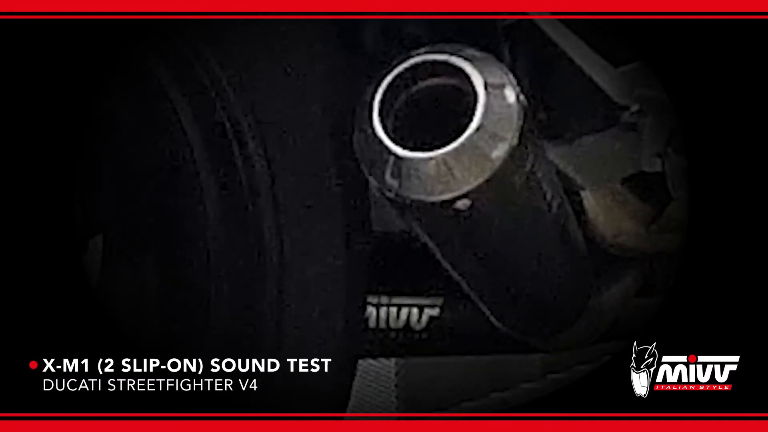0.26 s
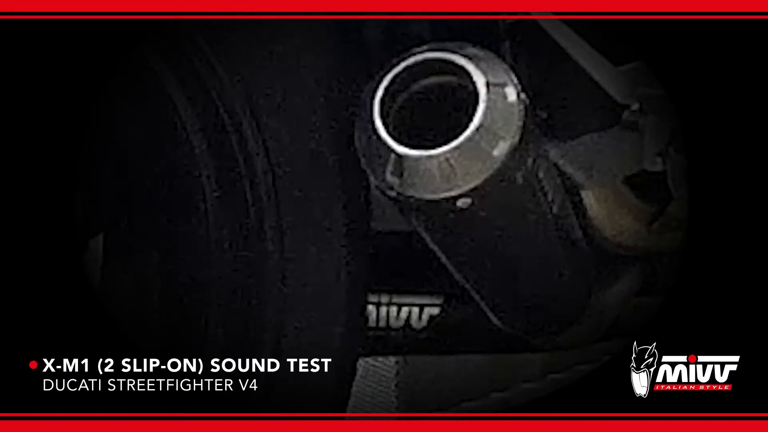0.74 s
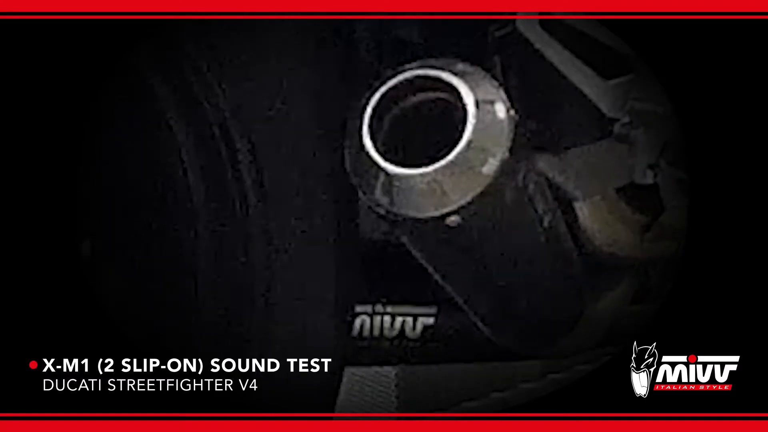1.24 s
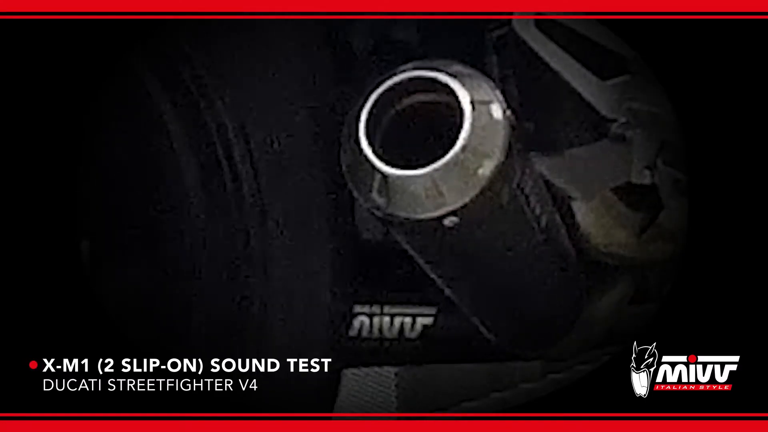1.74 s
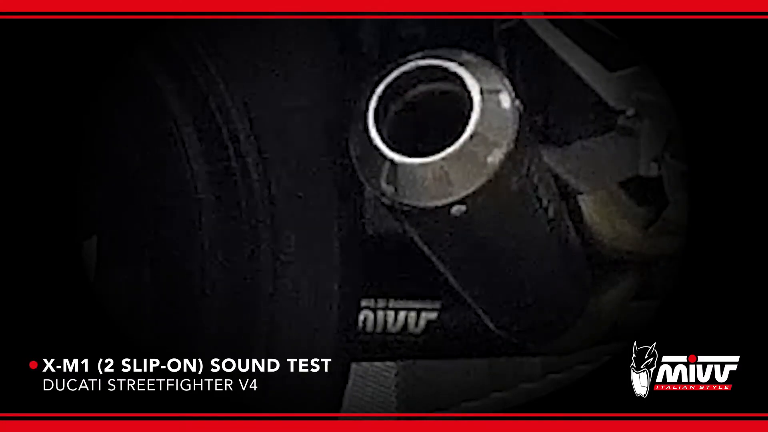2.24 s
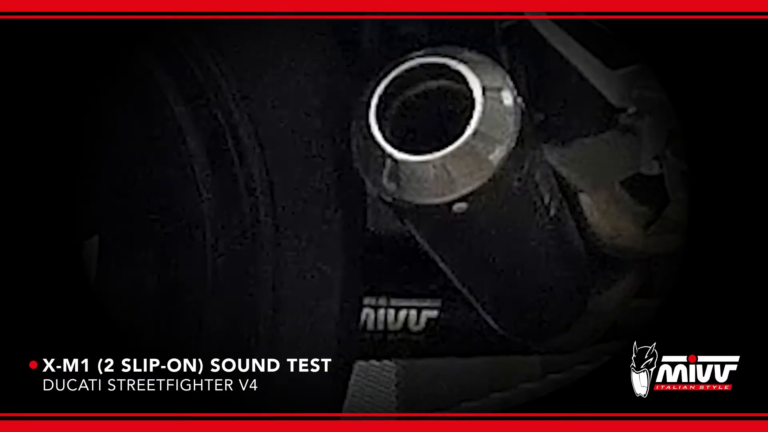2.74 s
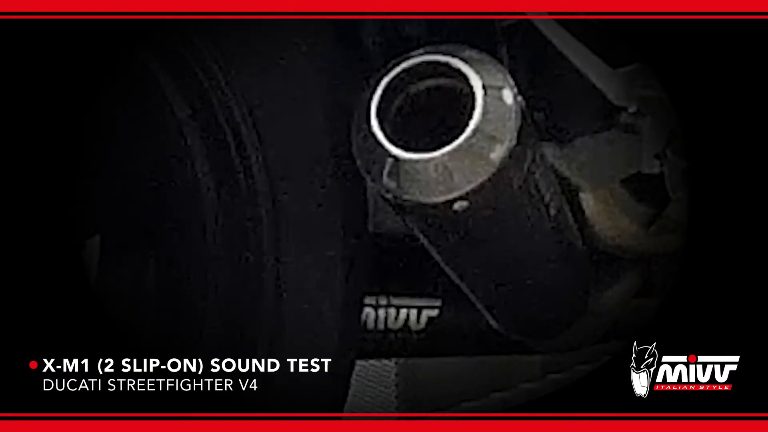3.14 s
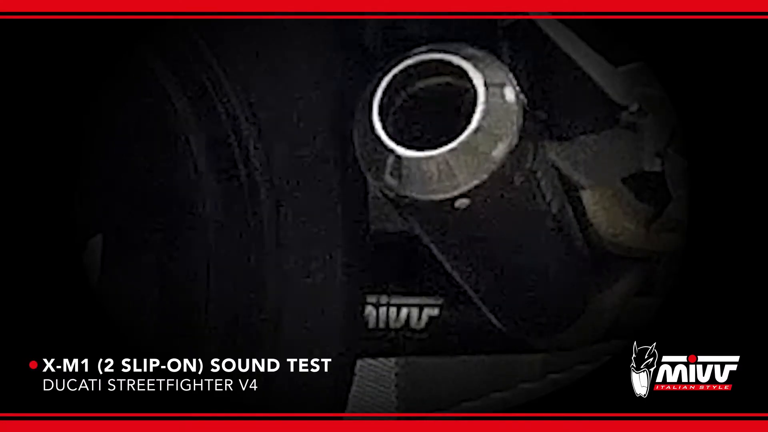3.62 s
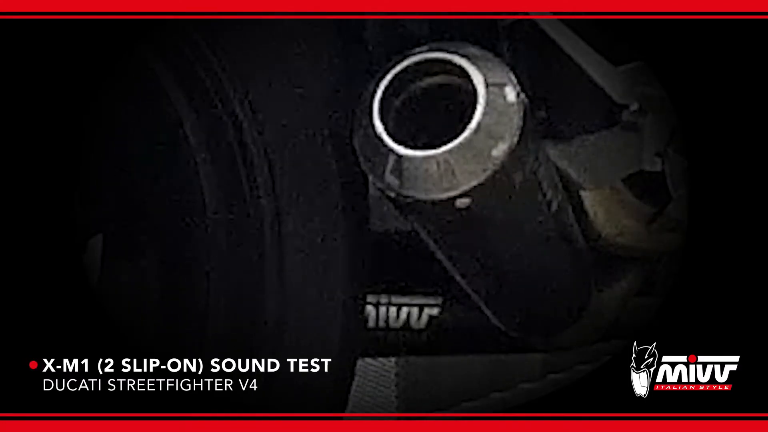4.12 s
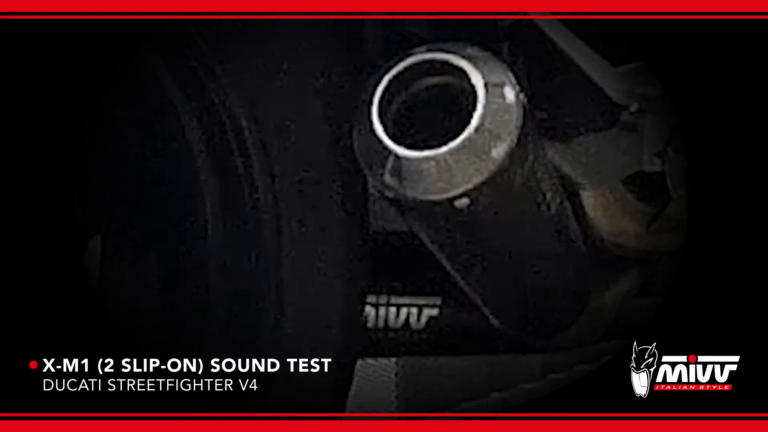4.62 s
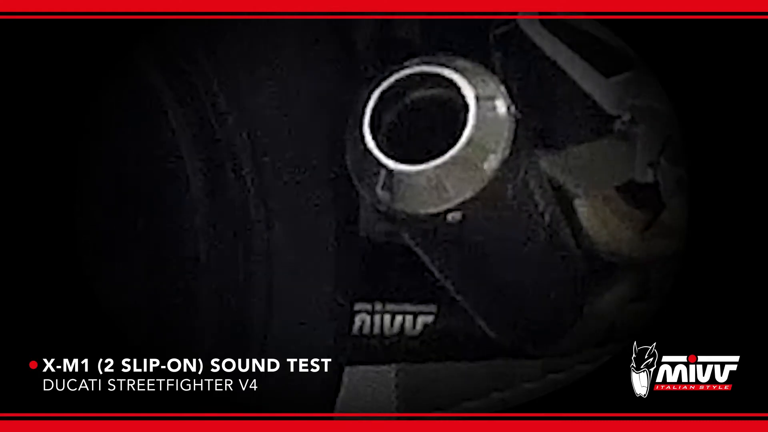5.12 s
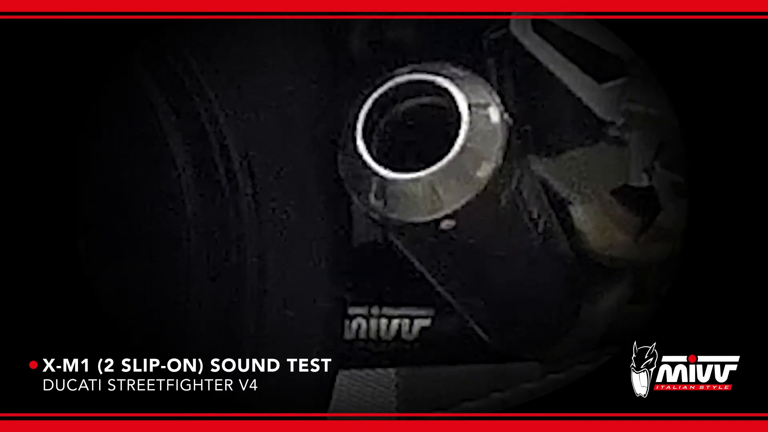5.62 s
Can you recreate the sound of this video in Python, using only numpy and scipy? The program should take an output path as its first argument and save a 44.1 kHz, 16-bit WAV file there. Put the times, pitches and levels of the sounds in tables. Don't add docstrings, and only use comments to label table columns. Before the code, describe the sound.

A four-cylinder motorcycle revs hard beside its exhaust, pitch climbing, cutting off with sharp crackles, then pulling up longer and higher before another drop.

```python
import sys
import numpy as np
from scipy import signal
from scipy.fft import rfft, irfft, next_fast_len
from scipy.io import wavfile
from scipy.ndimage import uniform_filter1d, map_coordinates

SR = 44100
rng = np.random.default_rng(int(sys.argv[2]) if len(sys.argv) > 2 else 0)


def amplitude_ratio(level_db):
    exponent = np.asarray(level_db, float) / 20
    return 10 ** exponent


def store_wav(level_fs):
    pcm = np.round(np.clip(np.atleast_2d(level_fs), -1, 1) * 32767)
    wavfile.write(sys.argv[1], SR, pcm.T.astype(np.int16))


N = 258426

# (time [s], cycle rate [Hz], effort on the main boom [dB])
ENGINE = [(0, 32.62, -3), (.97, 46.9, 0), (1.04, 45.93, -1), (1.28, 33.15, 1), (1.63, 35.65, -3),
          (1.77, 39.5, -1), (1.84, 35.4, -2), (2.0, 37.3, -2), (2.66, 41.27, -0.3), (3.1, 45.9, -1),
          (4.26, 59.27, -1), (4.77, 64.1, 4), (4.96, 65.7, 1), (5.24, 45.3, -2), (5.33, 41.46, -2),
          (5.46, 50.63, -1.5), (5.71, 53.06, 0), (5.86, 50.3, -1.5)]
# (time [s], throttle opening [0-1, over when snatched], unevenness of burns [dB], gas flow [dB])
THROTTLE = [(0, 0.93, -27, -25), (.32, 1.02, -33.5, -20.5), (.95, 1.05, -40, -21), (1.035, 1.13, -31, -22),
            (1.055, 0, -26.5, -23), (1.27, 0.09, -26, -27.5), (1.62, 0.11, -21, -23.5),
            (1.77, 0.92, -26, -20.5), (1.86, 0.89, -32, -22), (2.36, 1.02, -40, -19.5),
            (2.75, 1.02, -52, -21.5), (4.9, 0.93, -41, -22), (4.973, 1.03, -33, -22),
            (4.988, 0.2, -25, -22.5), (5.15, 0.07, -27.5, -24.5), (5.3, 0.08, -35, -26),
            (5.48, 0.01, -25, -24.5), (5.86, 0.4, -28, -24.5)]
FIRING_DEG = [0, 90, 290, 380]
# (cycle rate [Hz], 5th order [dB], 4th order [dB], low throb [dB], orders 6-8 [dB])
BY_SPEED = [(33.8, -22, -38.5, -35.5, -2.5), (36.65, -18, -32.5, -35.5, -2), (39.56, -9.5, -41.5, -45.5, 2),
            (45.2, -5.5, -34.5, -39.5, 0.1), (51.4, -6, -19.5, -29.5, 1), (54.2, -8.5, -22.5, -25.5, 3.5),
            (60.25, -10.5, -14.5, -24.5, -5), (64.04, -17, -18, -25.5, 0.1)]
SHUT_DB = dict(fifth=-5, fourth=3.5, throb=3.5, near=-10, upper=-13.5, mesh=-15, shield=1)
LOW_DB = [-2.3, -1, -3.5]
UPPER_DB = [11, 12, 13, 13, 15.5, 6, 10, 7.0, 4.5, 7.5, 4.3, 4, 0.3, -2, 5, -17, 1.2]
# (frequency [Hz], width [Hz], level [dB])
CHAMBER = [(62.2, 15, 0), (111.1, 27.5, 1.5), (155.4, 32, -2.5), (200, 49, -.5)]
# (frequency [Hz], width [Hz], level [dB])
PIPE = [(219.4, 15.7, -30.5), (249, 27.2, -29.0), (280.6, 34.5, -39.5), (340, 11, -44),
        (397.5, 22.3, -39.5), (450.5, 23.5, -43), (489.3, 24.5, -41.5), (521.5, 29, -43.5), (604, 13, -46),
        (620, 16, -50), (704, 21, -51), (763.6, 36, -46), (812, 46, -49.5), (851, 37, -55),
        (958, 37, -43.5), (1194, 60, -47), (1425, 180, -48.5), (1590, 33, -39), (1830, 68, -51.6),
        (2185, 240, -33.5)]
# (frequency [Hz], width [Hz], level [dB])
BOOM = [(61.6, 9.5, -9), (114, 23, -6), (156, 31, -15), (196, 25, 1), (268, 79, -8.5)]
# (frequency [Hz], width [Hz], level [dB])
SPUTTER = [(320, 66, -7), (407, 40, -19), (496, 27, -15)]
# (cycle rate [Hz], half width [Hz], level [dB])
MEET_ORDERS = [6, 7, 7, 8, 9, 11, 11, 12, 12, 14, 15, 16, 16, 18, 1, 1, 3, 10, 10, 14, 6, 24]
MEET = [(60, 1.77, 4), (33.3, 1.35, 2), (55.7, 1.3, -15), (61, .8, -7), (41, 0.79, -7), (44.3, 1.4, -4),
        (65.2, 2, 8.5), (38, 0.58, -19), (63, 2.1, -13), (53, 2.3, -9), (58.93, 1.78, 8), (41, 1.7, -15),
        (54, 2.08, -9), (59.48, 1.3, 10), (46.5, 1.5, 8), (52, 1.5, -15), (35.7, 2.5, -8), (34.1, 1.4, 4.5),
        (61.4, 2.5, -4.5), (39, 1.5, -9), (33.3, 1.3, 3.5), (38, 1.5, 7.5)]
# (time [s], peak level [dB])
SPITS = [(1.1684, 0), (1.1948, 1), (1.2224, -1), (1.2344, -18), (1.2511, -14), (1.2644, 0), (1.3004, -7),
         (1.3517, -12), (1.3808, -9), (5.2103, -16), (5.2538, -16), (5.2651, -4), (5.2883, -6),
         (5.3024, -11), (5.3254, -16), (5.396, -6)]
# (frequency [Hz], level per Hz [dB])
GEAR = [(880, -73), (1500, -18.5), (1720, -19.5), (1980, -16), (2160, -11), (3340, 2.5), (4440, -6),
        (5890, -2), (6510, -8.5), (7500, -16.5), (9750, -18), (16500, -120)]
JET = [(3530, -62), (6000, -19), (6890, -3), (10300, 0.5), (11600, 3), (12900, -1.5), (14700, -1),
       (15900, -14)]
# (frequency [Hz], width [Hz], level [dB])
CASE = [(2850, 40, 2), (3290, 55, 3), (3520, 80, 0), (3740, 90, 1), (4220, 80, 2), (5690, 45, 4),
        (5900, 75, 3), (6100, 45, 4), (6560, 60, 2), (9000, 120, -3)]
# (frequency [Hz], width [Hz], level [dB])
MESH_RING = [(4700, 700, -43), (5700, 130, -24), (5900, 150, -32), (6110, 150, -28), (7600, 800, -41)]
DOUBLE_RING = [(9050, 300, -29)]
# (time [s], half length [s], level [dB])
BUZZ = [
    (.28, .03, -30),
    (0.594, .09, -30.5),
    (0.857, 0.028, -25.5),
    (2.571, 0.086, -27.5),
    (2.962, 0.075, -28.5),
    (3.358, 0.16, -35),
    (4.5, 0.25, -37),
    (5.224, 0.033, -38),
    (5.488, 0.033, -37),
    (5.86, 0.013, -46),
]
# (frequency [Hz], width [Hz], level [dB])
SHIELD = [(1238, 13, 4.5), (1390, 68, -6), (1475, 39, -2.5), (1554, 11, -1.5)]
# (time [s], bands [count])
SIDE_PUFFS = [(2.42, 1), (2.513, 1), (2.59, 1), (3.07, 1), (3.727, 1), (3.78, 2), (4.05, 3), (4.35, 1),
              (4.422, 1), (4.493, 3), (4.652, 3), (4.812, 2), (4.885, 3), (5.141, 1), (5.747, 1)]


def exhaust(cycles):
    ragged_db = controls()[3]
    shaken = cycles + amplitude_ratio(1.6 * ragged_db + 3) * wobble(30)
    return firing_orders(shaken) + uneven_burns(shaken) + gas_noise()


def firing_orders(cycles):
    hz, effort_db, shut, ragged_db, _ = controls()
    speed, *passed = np.transpose(BY_SPEED)
    fifth_db, fourth_db, throb_db, near_db = (np.interp(hz, speed, db) for db in passed)
    lifted = np.clip(shut, 0, 1)
    clean_db, misfire_db = -38, -27
    failing = np.clip((ragged_db - clean_db) / (misfire_db - clean_db), 0, 1)
    stumble_db = 1.5
    fifth_db += effort_db + lifted * (SHUT_DB['fifth'] + stumble_db * wobble(28))
    fourth_db += lifted * (SHUT_DB['fourth'] + stumble_db * wobble(24))
    throb_db += lifted * SHUT_DB['throb']
    near_db += shut * failing * SHUT_DB['near']
    upper_db = shut * SHUT_DB['upper']

    throb = unit(orders(enumerate(LOW_DB, 1), CHAMBER, cycles, hz, flutter_db=1.2, steep=3))
    chassis = unit(filtered(rng.standard_normal(N), lambda f: modes(BOOM[:2], f)))
    throb += amplitude_ratio(-17.5) * chassis
    throb /= np.sqrt(abs(uniform_filter1d(throb ** 2, size=SR // 6)))
    out = amplitude_ratio(throb_db + 1.0) * throb
    out += amplitude_ratio(fifth_db) * np.sqrt(2) * np.cos(2 * np.pi * 5 * cycles)
    out += amplitude_ratio(fourth_db) * np.sqrt(2) * np.sin(2 * np.pi * 4 * cycles)

    tail_db = -4.5 - 0.63 * np.arange(14)
    upper = list(enumerate([*UPPER_DB, *tail_db], 6))
    near_flutter_db = 1.34 * amplitude_ratio(.5 * ragged_db + 22)
    upper_flutter_db = 1.23 * amplitude_ratio(.5 * ragged_db + 23.5)
    out += amplitude_ratio(near_db) * orders(upper[:3], PIPE, cycles, hz, near_flutter_db)
    out += amplitude_ratio(upper_db) * orders(upper[3:], PIPE, cycles, hz, upper_flutter_db)
    return out


def orders(table, pipe_modes, cycles, cycle_hz, flutter_db, steep=1):
    grid = np.arange(0, 3000.)
    pipe = modes(pipe_modes, grid)
    far_share, far_lag_s = 0.2, 0.0017
    tone = np.zeros(N)
    for k, db in table:
        firing_phase = np.angle(np.sum(np.exp(-2j * np.pi * k * np.array(FIRING_DEG) / 720)))
        lag = firing_phase + np.interp(k * cycle_hz, grid, np.unwrap(np.angle(pipe)))
        size = amplitude_ratio(db + flutter_db * (wobble(14) + 0.82 * wobble(3.954)))
        size *= np.interp(k * cycle_hz, grid, abs(pipe)) ** steep
        size *= abs(1 + far_share * np.exp(-2j * np.pi * k * (380 / 720 + far_lag_s * cycle_hz)))
        for n, (hz, half, gain_db) in zip(MEET_ORDERS, MEET):
            if n == k:
                size *= amplitude_ratio(gain_db * np.exp(-.5 * ((cycle_hz - hz) / half) ** 2))
        tone += size * np.sqrt(2) * np.cos(2 * np.pi * k * cycles + lag)
    return tone


def uneven_burns(cycles):
    fires = (np.arange(int(cycles[-1]))[:, None] + np.array(FIRING_DEG) / 720).ravel()
    late = .12 * rng.uniform(size=len(fires))
    fires = np.clip(fires + late, 0, cycles[-1] - 1)
    kicks = np.zeros(N)
    kicks[np.searchsorted(cycles, fires)] = rng.uniform(-0.55, 1, len(fires))
    muffled = lambda f: modes(BOOM + SPUTTER, f) / (1 + 1j * f / 700) ** 3
    return amplitude_ratio(controls()[3]) * unit(filtered(kicks, muffled))


def gas_noise():
    upper_db = controls()[2] * SHUT_DB['upper']
    roar = unit(filtered(rng.standard_normal(N), lambda f: modes(PIPE[3:16], f)))
    rumble = unit(filtered(rng.standard_normal(N), lambda f: modes([(54.7, 51, 0)], f) ** 2))
    return amplitude_ratio(upper_db - 35.5) * roar + amplitude_ratio(-41.5) * rumble


def spits():
    high, low, t = np.zeros(N), np.zeros(N), np.arange(SR // 20) / SR
    t60_s, body_db = .008, -13
    for s, db in SPITS:
        envelope = amplitude_ratio(db - 60 * t / t60_s) * (1 - np.exp(-t / .0005))
        puff = envelope * rng.standard_normal(len(t))
        high[round(s * SR):][:len(t)] += puff
        low[round(s * SR):][:len(t)] += puff * amplitude_ratio(body_db)
    crack = filtered(high, lambda f: modes([(11610, 4100, 0)], f))
    body = filtered(low, lambda f: modes([(4000, 4000, 0)], f))
    return 0.75 * crack + 0.55 * body


def hiss(cycles):
    gear_db = controls()[4] + 0.24 * wobble(6)
    jet_db = gear_db - 0.24
    turn = 2 * np.pi * cycles
    beat = 0.74 * np.cos(turn) + 0.31 * np.cos(2 * turn) + 0.62 * np.cos(4 * turn)
    shared = 0.23 * wobble(250) + 0.053 * wobble(60) + 0.32 * wobble(11)
    gear_swell_db = beat + shared + 0.67 * wobble(90)
    jet_swell_db = 0.96 * beat + 0.5 * shared + 0.84 * wobble(400)
    noise = patchy(depth_db=1.14) * amplitude_ratio([gear_swell_db, jet_swell_db])
    casing = lambda f: np.sqrt(1 + sum(abs(modes([m], f)) ** 2 for m in CASE))
    gear = unit(filtered(noise[0], lambda f: amplitude_ratio(along(GEAR, f)) * casing(f)))
    jet = unit(filtered(noise[1], lambda f: amplitude_ratio(along(JET, f)) * casing(f)))
    return amplitude_ratio(gear_db) * gear + amplitude_ratio(jet_db) * jet


def whine(cycles):
    drive = amplitude_ratio(SHUT_DB['mesh'] * np.clip(controls()[2] - .15, 0, 1))
    turn = 2 * np.pi * 120 * cycles + .75 * wobble(220)
    mesh = drive * amplitude_ratio(2 * wobble(50)) * np.sin(turn)
    double = drive * amplitude_ratio(3 * wobble(60)) * np.sin(2 * turn)
    return np.sqrt(2) * (filtered(mesh, gearbox(MESH_RING)) + filtered(double, gearbox(DOUBLE_RING)))


def gearbox(table):
    def response(f):
        return np.sqrt(sum(amplitude_ratio(db) ** 2 * abs(modes([(c, w, 0)], f)) ** 4 for c, w, db in table))
    return response


def buzz(cycles):
    shake = rng.standard_normal(N) * amplitude_ratio(0.57 * np.cos(2 * np.pi * cycles) + 2.6 * wobble(120))
    t = np.arange(N) / SR
    bursts = sum(amplitude_ratio(db) * np.exp(-.5 * ((t - s) / half) ** 2) for s, half, db in BUZZ)
    idle = amplitude_ratio(-44.5 + SHUT_DB['shield'] * controls()[2])
    return amplitude_ratio(-7.0) * (bursts + idle) * unit(filtered(shake, lambda f: modes(SHIELD, f)))


def side_noise():
    out, size = np.zeros(N), SR // 21
    hz = np.fft.rfftfreq(size, 1 / SR)
    for s, count in SIDE_PUFFS:
        for _ in range(int(count)):
            centre_hz = rng.uniform(5200, 14500)
            inside = abs(hz / centre_hz - 1) < .11
            band = irfft(rfft(rng.standard_normal(size)) * inside, size)
            puff = amplitude_ratio(-34) * unit(band) * signal.windows.tukey(size, .7)
            out[round(s * SR) - size // 2:][:size] += puff
    return out


def controls():
    hz, effort_db = curves(ENGINE)
    opening, ragged_db, flow_db = curves(THROTTLE)
    flywheel_s = .03
    hz = uniform_filter1d(hz, size=round(flywheel_s * SR))
    return hz, effort_db, 1 - opening, ragged_db, flow_db


def curves(rows):
    s, *cols = np.transpose(rows)
    return [np.interp(np.arange(N) / SR, s, c) for c in cols]


def along(points, hz):
    f, v = np.transpose(points)
    return np.interp(np.log(hz + 1), np.log(f + 1), v)


def modes(table, f):
    return sum(amplitude_ratio(db) * 1j * f * w / (c * c - f * f + 1j * f * w) for c, w, db in table)


def filtered(x, response):
    m = next_fast_len(N + SR // 2)
    return irfft(rfft(x, m) * response(np.fft.rfftfreq(m, 1 / SR)), m)[..., :N]


def wobble(rate):
    knots = rng.standard_normal(int(N * rate / SR) + 4)
    return map_coordinates(knots, [np.arange(N) * rate / SR])


def patchy(depth_db):
    z = signal.stft(rng.standard_normal((2, N)), nperseg=512)[2]
    field = uniform_filter1d(rng.standard_normal(z.shape), size=3, axis=1)
    field = uniform_filter1d(field, size=18, axis=2)
    return signal.istft(z * amplitude_ratio(depth_db * unit(field)), nperseg=512)[1][:, :N]


def unit(x):
    return x / np.sqrt(np.mean(x ** 2) + 1e-20)


def scene():
    cycles = np.cumsum(controls()[0]) / SR
    mix = exhaust(cycles) + spits() + hiss(cycles) + whine(cycles) + buzz(cycles)
    return np.tile(mix, (2, 1))


def roll_off(x):
    return signal.sosfilt(signal.butter(12, 16020, fs=SR, output="sos"), x)


def record(dry):
    loud = dry / (1 + abs(dry / 1.1) ** 9) ** (1 / 9)
    loud = loud + np.outer([1, -1], side_noise())
    loud = np.clip(filtered(loud, lambda hz: hz < 15850), -1, 1)
    return roll_off(loud)


dry = scene()
out = record(dry)
store_wav(out)
```